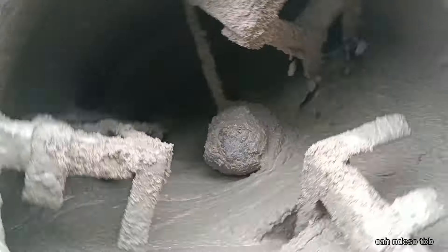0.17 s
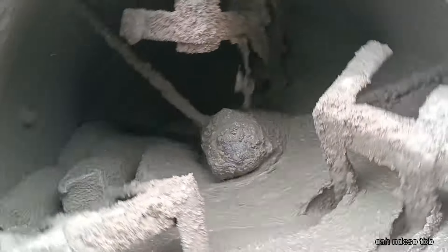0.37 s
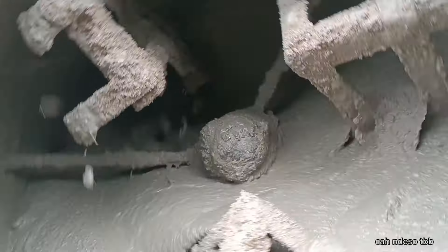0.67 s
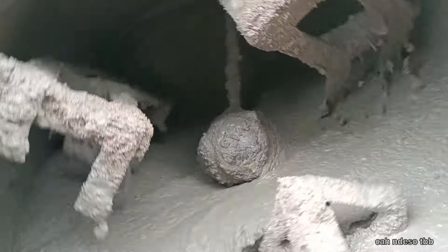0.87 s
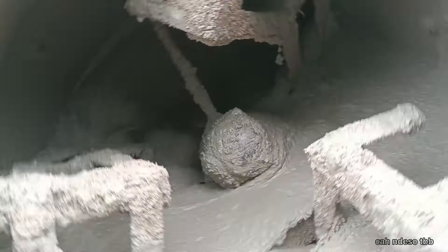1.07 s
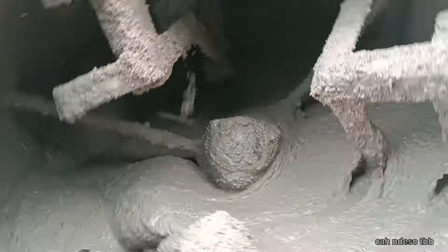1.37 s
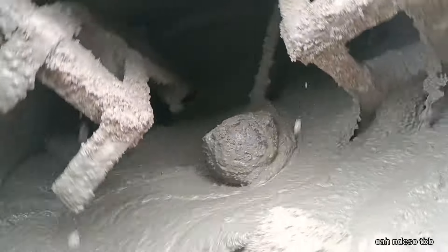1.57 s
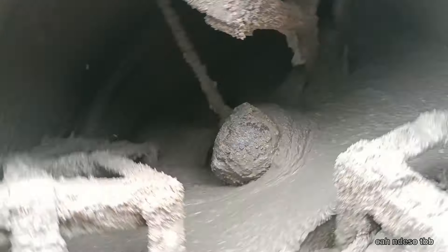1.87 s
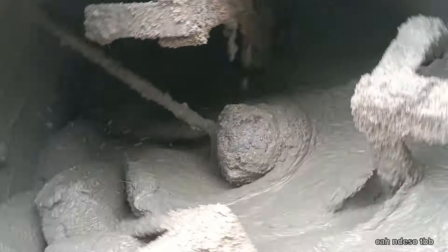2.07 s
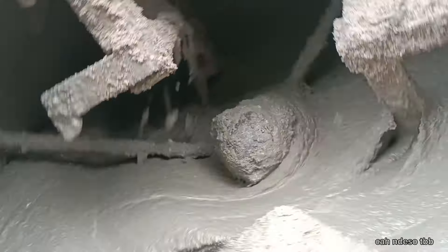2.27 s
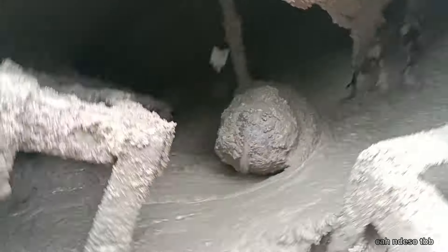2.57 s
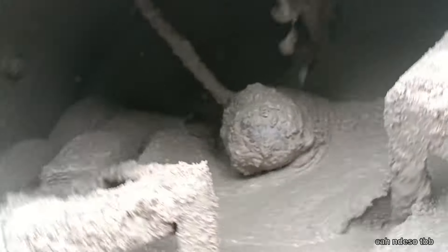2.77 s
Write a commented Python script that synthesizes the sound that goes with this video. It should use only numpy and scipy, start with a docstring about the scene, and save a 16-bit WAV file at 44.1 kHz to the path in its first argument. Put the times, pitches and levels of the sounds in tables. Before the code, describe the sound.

Close to a turning mixer drum, loose gear teeth clank and rattle over steady low rumble and engine chugging, while concrete plops, gravel scrapes and stones chirp inside the echoing steel; the loud sound is slightly squashed.

```python
"""Close to the mouth of a turning concrete mixer driven by a slow single-cylinder engine.
Modes of an iron ring clank under loose gear teeth, and the hollow drum booms at its air resonance.
Exhaust puffs are short gliding tones; wet concrete, grit and shell thuds are crowds of small impacts.
Plops and spatters are filtered noise bursts, squeaks are rough gliding tones, over a low noise rumble.
The sound is loud enough to work the recorder's limiter."""
import sys
import numpy as np
from scipy import signal
from scipy.fft import rfft, irfft
from scipy.io import wavfile
from scipy.ndimage import uniform_filter1d

SR = 44100
rng = np.random.default_rng(int(sys.argv[2]) if len(sys.argv) > 2 else 0)


def wav_out(sig):
    """Save sig, one row per channel (or a flat mono array), as 16-bit PCM at SR to the path in sys.argv[1]."""
    wavfile.write(sys.argv[1], SR, np.round(np.clip(np.atleast_2d(sig).T, -1, 1) * 32767).astype(np.int16))


N = 129213


def amp(db):
    """Level definition: decibels to amplitude gain."""
    return 10 ** (np.asarray(db) / 20)


def unit(x):
    """Energy normalization: scales to rms 1."""
    return x / np.sqrt(np.mean(x ** 2) + 1e-20)


def noise(count):
    """Gaussian white noise in two independent channels."""
    return rng.standard_normal((2, count))


def decay(t, t60, hold_s=0):
    """Exponential decay by 60 dB in t60 seconds, after a hold at full level."""
    return amp(-60 * np.maximum(t - hold_s, 0) / t60)


def level(curve):
    """Level envelope: gain at every sample, linear in dB between (t/s, level/dB) points."""
    return amp(np.interp(np.arange(N) / SR, *np.transpose(curve)))


def pan(db):
    """Interchannel level difference: left and right gains of mean power 1, left louder for db > 0."""
    return unit(amp([[db / 2], [-db / 2]]))


def colour(x, spectrum):
    """Spectral shaping by (f/Hz, level/dB) points on a logarithmic frequency axis, to rms 1."""
    hz, db = np.transpose(spectrum)
    f = np.fft.rfftfreq(x.shape[-1], 1 / SR)
    gain = amp(np.interp(np.log(f + 1), np.log(hz), db))
    return unit(irfft(rfft(x) * gain, x.shape[-1]))


def hump(hz, width, slope=1):
    """Resonance curve as spectrum points; width is a share of the pitch, slope multiplies the dB."""
    offset = np.linspace(-1, 1, 401)  # natural log of the frequency ratio
    db = -10 * np.log10(1 + (2 * offset / width) ** 2) - 40 * offset ** 4
    return np.c_[hz * np.exp(offset), slope * db]


def drift(rate_hz):
    """Low-pass random fluctuation of rms 1."""
    f = np.fft.rfftfreq(N, 1 / SR)
    return unit(irfft(rfft(rng.standard_normal(N)) * np.exp(-(f / rate_hz) ** 2), N))


def blend(pair, width):
    """Interchannel correlation: a common part plus an opposed part; width 0 is mono."""
    return unit(pair[0] + np.array([[1], [-1]]) * width * pair[1])


def add(mix, s, sound):
    """Superposition: adds a sound into the mix at time s."""
    part = mix[:, max(round(s * SR), 0):][:, :sound.shape[-1]]
    part += sound[..., :part.shape[1]]


def grains(per_s, spread_db, t60, direct):
    """Shot noise: random little impacts convolved with one of eight decaying echoes in the drum."""
    places = 8
    struck = rng.random(N) < per_s / SR
    size = amp(spread_db * np.minimum(rng.exponential(1, N), 4))
    clicks = struck * size * rng.choice([-1, 1], N)
    place = rng.integers(0, places, size=N)
    t = np.arange(4096) / SR
    out = np.zeros((2, N))
    for k in range(places):
        echo = noise(len(t)) * (decay(t, t60) + direct * np.exp(-t / 0.00092))
        out += signal.oaconvolve((clicks * (place == k))[None], echo, axes=1)[:, :N]
    return unit(out)


def pitched_grains(per_s, low_hz, high_hz, cycles, spread_db, t60, wet_db, count):
    """Impulsive excitation of damped resonators at random pitches and places, echoed by the drum."""
    t = np.arange(1200) / SR
    pitches = np.linspace(low_hz, high_hz, count)[:, None, None]
    tones = np.sin(2 * np.pi * (pitches * t + rng.random((count, 2, 1))))
    envelope = np.exp(-t * pitches / cycles) * (1 - np.exp(-t * pitches / 2))
    rings = np.sqrt(pitches) * tones * envelope  # the root offsets the shorter ringing of high pitches
    out = np.zeros((2, N))
    for when, kind, size, side in rng.random((int(per_s * N / SR), 4)):
        gain = amp(spread_db * min(-np.log(size), 3)) * np.sqrt([[side], [1 - side]])
        add(out, when * N / SR, rings[int(kind * count)] * gain)
    tail = noise(6000) * decay(np.arange(6000) / SR, t60)
    echo = signal.oaconvolve(out, tail / np.linalg.norm(tail[0]), axes=1)[:, :N]
    return unit(out + amp(wet_db) * echo)


def burst(spectrum, rise_s, t60, grain_db=0):
    """Transient filtered noise with exponential decay; grain_db makes it gritty."""
    t = np.arange(6144) / SR
    grain = amp(grain_db * np.repeat(noise(192), 32, axis=1))  # a new level every 32 samples
    return colour(noise(len(t)) * grain, spectrum) * np.minimum(t / rise_s, 1) * decay(t, t60, rise_s)


def boom():
    """Cavity resonance: the drum's air swells and sinks, sagging in pitch, with buffeting noise."""
    # swells of air booming in the drum: start t/s, length/s, level/dB, mid-swell f/Hz
    swells = [(0,0.072,-1.5,96.4), (0.077,0.034,-1.5,102), (0.113,.08,-5,98.5), (0.27,0.11,-14,99),
              (.375,0.091,-11.5,102.6), (0.485,0.052,-12,96), (0.55,0.099,-8.5,97.2),
              (0.623,0.073,-4.5,94.1), (0.722,0.062,-5.5,99.4), (0.824,0.1,2,92.3), (0.93,0.12,5,99.7),
              (1.046,0.086,1,101.7), (1.167,0.03,-11,81), (1.213,0.074,-7,96), (1.263,0.131,-4,101.5),
              (1.403,0.071,-9.5,99.7), (1.478,0.082,-2.5,94.8), (1.598,0.08,-5.5,97.3),
              (1.702,0.084,-8,94.7), (1.767,0.086,-10,81.6), (1.853,0.1,-10,94.2), (1.93,0.15,-18.5,108.6),
              (2.063,0.047,-19,98), (2.149,0.043,-5,92.4), (2.246,0.08,-1,100.3), (2.331,0.11,-3.5,97.6),
              (2.447,0.063,-10.5,98.6), (2.501,0.13,-7.5,101.7), (2.661,0.054,-7.5,88)]
    # spectrum of the buffeting air: f/Hz, level/dB
    buffet_spectrum = [(15, -2), (35, 2), (60, -1), (85, 6), (125, -1), (165, 0), (210, -2), (300, -12),
                       (600, -47.5)]
    sag, flutter_share = 0.072, 0.015  # shares of the pitch
    arch_power, edge_s, buffet_db = 0.53, 0.012, -17
    out = np.zeros((2, N))
    flutter = drift(rate_hz=17)
    buffet = colour(noise(N), buffet_spectrum)
    for s, length, db, hz in swells:
        u = np.linspace(0, 1, round(length * SR), endpoint=False)
        now = np.clip(round(s * SR) + np.arange(len(u)), 0, N - 1)
        pitch = hz * (1 - sag * (u - 0.5) + flutter_share * flutter[now])
        turns = np.cumsum(pitch) / SR + rng.random()
        fade = np.minimum(np.minimum(u, 1 - u) * length / edge_s, 1)
        air = np.sin(2 * np.pi * turns) + amp(buffet_db) * blend(buffet[:, now], width=0.19)
        add(out, s, amp(db) * fade * np.sin(np.pi * u) ** arch_power * air)
    return out * pan(db=0.3)


def shell():
    """Structural transmission: dull thuds of the tumbling load, coloured by the drum wall."""
    # rumble of the drum shell under the load: t/s, level/dB
    shell_level = [(0.0, -7.5), (0.04, -23), (0.09, -12), (0.44, -20), (0.57, -12.5), (0.63, -15),
                   (0.83, -13.5), (1.11, -26.5), (1.37, -12.5), (1.76, -21), (1.78, -20.5), (2.0, -10),
                   (2.24, -28.5), (2.33, -16.5), (2.59, -16), (2.68, -21.5), (2.79, -13.5), (2.93, -22)]
    # spectrum heard through the wall: f/Hz, level/dB
    shell_spectrum = [(20, -42), (45, -29), (65, 1.5), (100, -8.5), (135, 3), (170, -1), (200, -2),
                      (235, -3.5), (274, 3.5), (310, -1.5), (370, -16), (460, -10.5), (1000, -45)]
    thuds = blend(grains(per_s=910, spread_db=1.5, t60=0.055, direct=0.54), width=0.096)
    patchy = amp(-0.5 * drift(rate_hz=77))
    return patchy * level(shell_level) * colour(thuds, shell_spectrum)


def slop():
    """Damped resonance in numbers: small wet pops of concrete folding over."""
    # concrete slopping over: t/s, level/dB
    slop_level = [(0,-19),(.06,-22.5),(.09,-25.5),(.23,-21.5),(.28,-24.5),(.42,-22),(.58,-22),(.68,-22.5),(.84,-28),(.89,-26.5),(1.03,-25.5),(1.2,-26.5),(1.35,-26.5),(1.4,-26),(1.48,-25),(1.66,-26.5),(1.74,-40),(1.81,-27),(2.0,-20.5),(2.13,-25.5),(2.25,-27),(2.35,-24.5),(2.55,-23),(2.64,-30.5),(2.67,-43),(2.78,-19.5),(2.93,-24)]
    # spectrum of the pops together: f/Hz, level/dB
    slop_spectrum = [(150, -18), (350, 15.5), (480, 2), (700, 9), (900, 7.5), (1080, 3.5), (1400, 7),
                     (2000, 4.5), (2800, 0), (4000, -13.5), (8000, -68)]
    pops = pitched_grains(per_s=1400, low_hz=309, high_hz=4499, cycles=14.8,
                          spread_db=3, t60=0.079, wet_db=-8, count=70)
    wet = colour(blend(pops, width=0.76), slop_spectrum)
    return amp(3) * level(slop_level) * wet * pan(db=-1.2)


def grit():
    """Granular friction: sand and gravel crackle as they slide over steel, over a fine wet wash."""
    # wet grit sliding on steel: t/s, level/dB
    grit_level = [(0.0, -22), (0.02, -27.5), (0.28, -27.5), (0.33, -25), (0.51, -26), (0.69, -32),
                  (0.73, -24), (0.74, -31), (0.83, -29), (0.86, -31), (1.22, -31), (1.23, -37),
                  (1.25, -14.5), (1.28, -24.5), (1.48, -25), (1.5, -38), (1.57, -27), (1.61, -34),
                  (1.7, -26.5), (1.71, -38.5), (1.85, -24), (1.87, -32), (2.06, -18), (2.11, -23.5),
                  (2.32, -37), (2.38, -22), (2.39, -31), (2.55, -23.5), (2.63, -26), (2.68, -40),
                  (2.7, -16.5), (2.73, -30), (2.76, -21.5), (2.79, -32), (2.83, -25), (2.85, -20.5),
                  (2.88, -28), (2.93, -17.5)]
    # spectrum of the grit on the left: f/Hz, level/dB
    left_spectrum = [(1000, -45), (2800, 7), (4300, 3.5), (5200, 0.5), (6500, 0), (7500, -4), (8000, -11),
                     (10000, -3.5), (12000, -7), (13700, -18), (14900, 3), (16000, 5)]
    # spectrum of the grit on the right: f/Hz, level/dB
    right_spectrum = [(1000, 15.5), (2800, 3), (4300, 5), (5000, -0.5), (6300, 2.5), (7500, 0.5),
                      (8100, -6), (10000, -13), (12000, -18), (13700, -13), (14900, 4.5), (16000, -7)]
    ticks = pitched_grains(per_s=3000, low_hz=1800, high_hz=16000, cycles=8,
                           spread_db=4.5, t60=0.07, wet_db=0, count=110)
    left, right = ticks + 0.6 * noise(N)
    both = np.array([colour(left, left_spectrum), colour(right, right_spectrum)])
    return amp(2) * level(grit_level) * both * pan(db=-6)


def rumble():
    """Stationary broadband noise: steady low churning of the turning drum and the engine."""
    # f/Hz, level/dB
    spectrum = [(20, -39), (45, -6), (65, -9), (100, 15), (150, -12.5), (230, 1.5), (275, -7.5),
                (400, -23.5), (750, -4), (1200, -17), (4000, -81)]
    return amp(-24) * blend(colour(noise(N), spectrum), width=0.37)


def puff(hz, sag_hz_per_s, lead_s):
    """Pulse-excited resonance: a few cycles passing hz at lead_s, falling in pitch if it sags."""
    rise_s, hold_s, t60, sag_end_s = 0.0047, 0.013, 0.056, 0.03
    t = np.arange(4000) / SR
    pitch = hz - sag_hz_per_s * (np.minimum(t, sag_end_s) - lead_s)
    turns = np.cumsum(pitch) / SR + rng.random()
    rise = np.sin(np.pi / 2 * np.minimum(t / rise_s, 1)) ** 2
    return rise * decay(t, t60, rise_s + hold_s) * np.sin(2 * np.pi * turns)


def engine():
    """Periodic excitation: an exhaust puff per firing, its drum echo and a knock half a cycle later."""
    # strength of the exhaust throb: t/s, level/dB
    throb_level = [(0,-12), (.13,2.5), (.23,2.5), (.34,0.5), (.45,-1), (.56,2), (.77,-1.5), (.88,-2),
                   (1.09,-7), (1.2,-3), (1.41,-1), (1.73,-6), (1.84,-3), (2.05,-0.5), (2.27,-9), (2.37,0),
                   (2.7,-4.5), (2.92,1.5)]
    first_firing_s, firing_s = 0.018, 0.1072
    lead_s = 0.0104  # each puff begins this long before its firing time
    echo_s, echo_db, knock_db = 0.03, -12.5, -16  # levels relative to the puff
    out = np.zeros((2, N))
    for s in np.arange(first_firing_s, N / SR, firing_s) - lead_s:
        db = -8.5 + 0.65 * rng.standard_normal()
        add(out, s, amp(db) * puff(310, 1100, lead_s))
        add(out, s + echo_s, amp(db + echo_db) * puff(292, 0, lead_s))  # the drum answers
        add(out, s + firing_s / 2, amp(db + knock_db) * puff(273, 0, lead_s))
    return out * level(throb_level)


def squeaks():
    """Stick-slip friction: a trapped stone slips on the drum wall, a rough tone gliding in pitch."""
    # stones squeaking: start t/s, length/s, level/dB, start f/Hz, end f/Hz
    slips = [(0.011, 0.019, -7, 1773, 1790), (0.029, 0.019, -11, 1790, 1724),
             (0.187, 0.019, -14, 1514, 1320), (0.287, 0.024, -14, 2296, 2240),
             (0.409, 0.028, -12, 1387, 1324), (.54, 0.015, -20, 1470, 1330),
             (.618, 0.029, -9.5, 1949, 1900), (1.169, .02, -21, 2200, 2300), (1.427, .018, -7, 1900, 1820),
             (1.473, 0.031, -11, 1900, 1820), (1.579, 0.031, -13, 1995, 1963),
             (1.734, 0.021, -15, 1940, 1814), (1.902, 0.035, -18.5, 2566, 2510),
             (1.908, 0.034, -16, 690, 647), (2.113, 0.057, -11, 1900, 1756),
             (2.119, 0.084, -21.5, 3350, 3000), (2.155, 0.0495, -12.5, 1837, 1547),
             (2.42, 0.017, -11.5, 1539, 1430), (2.901, 0.027, -12.5, 1930, 1860)]
    rise_s, fade_db, jitter_share = 0.0092, -9, 0.029
    out = np.zeros((2, N))
    for s, length, db, from_hz, to_hz in slips:
        u = np.linspace(0, 1, round(length * SR))
        jitter = unit(uniform_filter1d(noise(4096), size=80))[:, :len(u)]
        pitch = (from_hz + (to_hz - from_hz) * u) * (1 + jitter_share * jitter)
        turns = np.cumsum(pitch, axis=1) / SR
        shape = np.minimum(u * length / rise_s, 1) * amp(fade_db * u) * (1 - u ** 6)
        add(out, s, amp(db) * unit(shape * np.sin(2 * np.pi * turns)))
    return out


def gear():
    """Modal excitation: each tooth rings the iron gear and sets off a short clatter in the drum."""
    # teeth striking the ring: t/s, level/dB, favoured f/Hz, left-right/dB, bright edge level/dB,
    # grinding time/s, overtone f/Hz, low ring level relative to the clank/dB
    clanks = [(.0148,-9.5,1790,-6,-46,0.0081,2777,-20), (.0808,-11,1410,-3,-31,.013,2860,-5),
              (.191,-8.5,1560,-11,-43,0.003,4446,-7), (.2898,0.5,2180,10,-21.5,0.0055,3294,-35),
              (.4004,5,2200,0,-9.5,0.011,2470,-28), (.4137,-7,1320,-1,-24,0.028,3260,-24),
              (.4522,-0.5,1990,1,-26,0.0027,3080,-31), (.6163,-2,1980,1.5,-19.5,0.016,3115,-22),
              (.6312,-10,1880,7,-24,.007,3220,-15), (.6664,-2,1940,6,-29,0.012,3030,-14),
              (.7266,-1,1650,-4,-29,0.0047,2842,-10), (.769,-14.5,1560,-1,-52,0.0079,2840,0),
              (.8192,-11,1280,3,-25.5,.007,3260,-4), (.833,-7.5,1260,-3,-23,0.0025,3200,-7),
              (.8835,-7.5,1930,7,-36,.0061,3660,-28), (.9367,0,2090,0.5,-23,0.014,3400,-19),
              (.9646,-5,1860,4,-43,.0066,4489,-13), (1.0525,3.5,1843,-1.5,-17.5,0.013,3150,-23),
              (1.1694,-2.5,2060,0,-24,0.015,2880,-36), (1.2008,-5.5,1980,3.5,-14.5,0.018,2831,-4.5),
              (1.2214,-9,1810,0,-21,0.0081,2790,0), (1.2482,-2.5,1470,3.5,-14,0.015,2790,-8),
              (1.2688,3.5,1830,3,-15,.005,3250,-11), (1.3078,3,1770,0.5,-18.5,0.0077,3360,-15),
              (1.3693,-6.5,2360,-3,-14.5,0.0032,3815,-20), (1.4238,-0.5,1860,-0.5,-25,0.0099,3040,-11),
              (1.4738,0.5,1890,1.5,-20,0.0085,2810,-10.5), (1.5844,3,1530,-1.5,-30,0.011,3330,-32),
              (1.6376,-1,1940,-6,-25,0.0096,3509,-14), (1.6945,3,1870,6.5,-23,0.0092,3230,-16),
              (1.73,1,1890,6,-31,0.0038,3402,-24), (1.7962,-7.5,1896,2,-32,0.017,2840,-17),
              (1.8469,-11,1630,-4,-47,.026,4400,-5), (1.904,-12,2300,7,-29,.006,2450,-20),
              (1.9578,-11,1730,0,-38,0.0092,4560,-5), (2.0484,-9,2000,1,-20.5,.0082,4220,-33),
              (2.1168,1.5,1820,2,-15.5,0.0061,3140,-27), (2.1483,-5,1810,-2,-37,0.012,3380,-7),
              (2.176,-10.5,1700,8,-31,0.013,3050,-13), (2.2268,6.5,2000,1,-15.5,0.011,3369,-17),
              (2.2634,-7.5,1990,12,-28.5,0.012,2860,-23), (2.3785,-6.5,2050,3,-40,0.0033,2840,-15),
              (2.4242,-5,1530,-1,-25.5,0.0041,3290,-21), (2.4667,-9,1700,-5,-40,0.01,3200,-21),
              (2.5357,-1.5,1990,-2,-23.5,0.0083,4430,-16), (2.5514,-2.5,2070,-1,-39,0.011,4188,-29),
              (2.588,-4,1990,8,-38,0.0061,3219,-22), (2.6493,5,2075,-0.5,-14,0.013,3180,-10),
              (2.6962,4,1570,-2,-26,0.0084,4300,-24), (2.7108,1.5,2040,3.5,-29,0.012,3830,-16),
              (2.7584,-1,1710,-1,-18.5,0.011,2570,-12), (2.7754,-11.5,1900,1,-29,0.013,2842,-24),
              (2.8073,-3.5,2000,-0.5,-22.5,.0045,4310,0), (2.842,-1,1630,4,-22,0.012,2880,-8.5),
              (2.8559,5,1720,1,-17,0.0066,4140,-12), (2.907,1,1920,0.5,-21,.03,3400,-14)]
    # modes of the gear ring: f/Hz, level/dB, t60/s
    modes = [(1243, 2.5, 0.092), (1589, 1, 0.1), (1630, -6, 0.12), (1790, -2, 0.065), (1900, -6, 0.14),
             (1990, -2, 0.043), (2200, -1.5, 0.086), (2282, 9, 0.064), (2297, -8.5, 0.33),
             (2840, 2.5, 0.052), (3170, -1, 0.064)]
    # spectrum of the clatter: f/Hz, level/dB
    clatter_spectrum = [(300, -19), (1000, -5), (1500, -11), (1950, 8), (2400, 0.5), (2900, -22),
                        (5000, -83.5), (16000, -103)]
    # spectrum of the bright edge: f/Hz, level/dB
    edge_spectrum = [(1000, -6), (2400, 1), (2830, 5.5), (3020, 9), (3250, 12), (3550, 2.5), (3750, 9.5),
                     (4050, -13), (4350, 1.5), (4800, -6.5), (7500, -21.5), (10000, -30.5), (16000, -53)]
    chatter_spectrum = [(30, 9.5), (200, 14), (500, -26), (2000, -80)]  # f/Hz, level/dB
    focus_db, focus_hz = 21.5, 144  # each tooth favours the modes near its own pitch
    detune = 0.01353  # random share of each mode's pitch
    strike_s, edge_hold_s = 0.00053, 0.0028
    out = np.zeros((2, N))
    t = np.arange(6144) / SR
    hz, db, t60 = np.transpose(modes)[:, :, None]
    for s, clank_db, own_hz, pan_db, edge_db, grind_s, overtone_hz, low_db in clanks:
        weight = amp(db) * (1 + amp(focus_db) * np.exp(-((hz - own_hz) / focus_hz) ** 2))
        detuned_hz = hz * (1 + detune * rng.standard_normal((2, len(hz), 1)))
        turns = detuned_hz * t + rng.random((2, len(hz), 1))
        partials = weight * decay(t, t60, grind_s) * np.sin(2 * np.pi * turns)
        ring = partials.sum(1) / np.linalg.norm(weight)
        ring = ring * (1 + 0.089 * colour(noise(len(t)), chatter_spectrum))  # chattering teeth
        clatter = colour(noise(len(t)), clatter_spectrum) * decay(t, 0.21, grind_s)
        low = colour(noise(len(t)), hump(1530, width=0.1, slope=2)) * decay(t, 0.15, grind_s)
        edge = colour(noise(len(t)), edge_spectrum) * decay(t, 0.1, edge_hold_s + grind_s / 2)
        overtone = colour(noise(len(t)), hump(overtone_hz, width=0.023, slope=2))
        overtone = overtone * decay(t, 0.13, grind_s)
        hit = amp(clank_db) * (amp(-3.5) * ring + amp(-19) * clatter + amp(low_db - 4) * low)
        hit += amp(edge_db) * (amp(2) * edge + amp(-0.5) * overtone)
        add(out, s, hit * (1 - np.exp(-t / strike_s)) * pan(pan_db))
    return out


def plops():
    """Resonant noise bursts: lumps plop into the mix."""
    # lumps: t/s, level/dB, f/Hz, left-right/dB
    lumps = [(0.07, -7.5, 890, -5), (0.14, -12, 746, 4), (0.213, -18, 750, 10), (0.824, -9.5, 920, 4),
             (0.929, -15, 950, 2), (1.384, -7, 775, -2), (1.411, -10.5, 720, -2), (1.804, -11.5, 636, -7),
             (1.911, -14.5, 705, -3), (2.339, -14, 650, -12), (2.504, -11.5, 587, -9),
             (2.699, -10, 690, 12), (2.768, -11, 643, 5)]
    out = np.zeros((2, N))
    for s, db, hz, pan_db in lumps:
        plop = burst(hump(hz, width=0.16, slope=2), rise_s=0.0035, t60=0.42)
        add(out, s, amp(db - 15.5) * blend(plop, width=1) * pan(pan_db))
    return out


def spatters():
    """Narrow-band and broadband bursts together: bright spatters strike the steel and fizz."""
    # spatters: t/s, body level/dB, f/Hz, left-right/dB, fizz level/dB
    drops = [(0.235, -25, 6500, -6.5, -29.5), (0.332, -25, 4470, -4.0, -38), (0.3556, -17, 4360, -10, -41),
             (0.4139, -6.5, 5200, 1, -24), (0.4887, -18, 4360, -1, -32), (0.525, -19.5, 5160, 13, -44.5),
             (0.5917, -23.5, 7200, -8, -37), (0.72, -21.5, 6060, -19, -35), (0.8174, -28, 6530, -3.5, -35),
             (1.128, -15, 3400, 8, -29), (1.2448, -8.5, 7400, -1, -22), (1.4274, -21, 5830, 5, -23.5),
             (2.0553, 1, 4230, -0.5, -18), (2.372, -17, 6440, -18, -44), (2.2264, -18, 5470, 5, -48),
             (2.611, -20, 6260, -10, -40), (2.6943, -12.5, 5540, -4, -28), (2.84, -13.5, 5700, 0, -37),
             (2.917, -13, 7400, -2, -22)]
    # spectrum of the fizz: f/Hz, level/dB
    fizz_spectrum = [(3000, -12), (6000, -2), (10000, -6.5), (13500, -10), (15000, 10.5), (16000, 0)]
    out = np.zeros((2, N))
    for s, db, hz, pan_db, fizz_db in drops:
        body = burst(hump(hz, width=0.054), rise_s=0.0021, t60=0.15, grain_db=2.5)
        fizz = burst(fizz_spectrum, rise_s=0.0048, t60=0.05, grain_db=5)
        add(out, s, (amp(db - 7) * body + amp(fizz_db + 9.5) * fizz) * pan(pan_db))
    return out


def scene():
    """Superposition of all sources, with an interaural-style delay on boom, engine and shell."""
    left, right = boom() + shell() + engine()
    lag_s = 0.000479  # these low sounds reach the left microphone later
    t = np.arange(N) / SR
    low = np.array([np.interp(t - lag_s, t, left), right])
    return low + slop() + grit() + rumble() + squeaks() + gear() + plops() + spatters()


def record(dry):
    """Dynamic range limiting: a fast limiter ducks everything under the peaks; then the band limit."""
    drive_db, ceiling, release_db_per_s, cutoff_hz = 0.5, 0.98, 127, 15850
    x = dry * amp(drive_db)
    over_db = 20 * np.log10(np.maximum(abs(x).max(0) / ceiling, 1))
    fall = np.arange(N) * release_db_per_s / SR
    held_db = np.maximum.accumulate(over_db + fall) - fall  # instant attack, steady release
    duck_db = uniform_filter1d(held_db, size=40)
    x = np.clip(x * amp(-duck_db), -1, 1)
    low_pass = signal.firwin(511, cutoff_hz, window=("kaiser", 8), fs=SR)
    return signal.oaconvolve(x, low_pass[None], "same")


dry = scene()
out = record(dry)
wav_out(out)
```